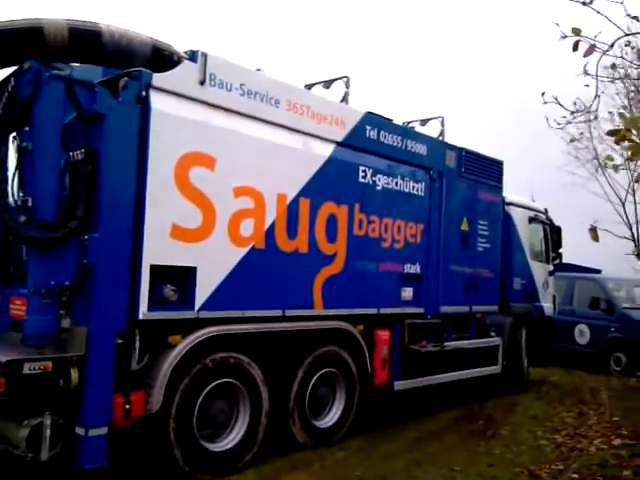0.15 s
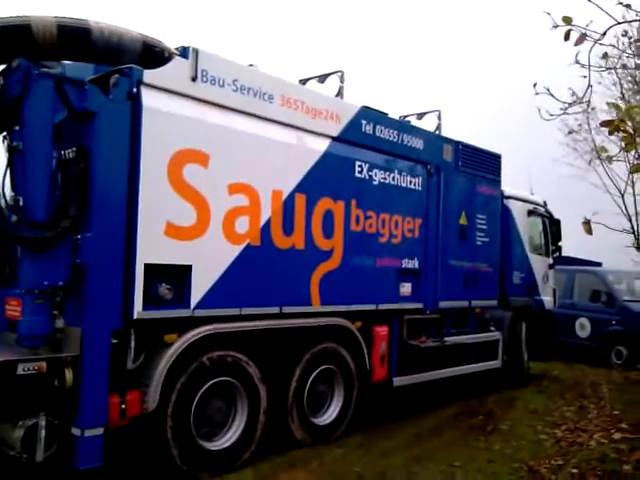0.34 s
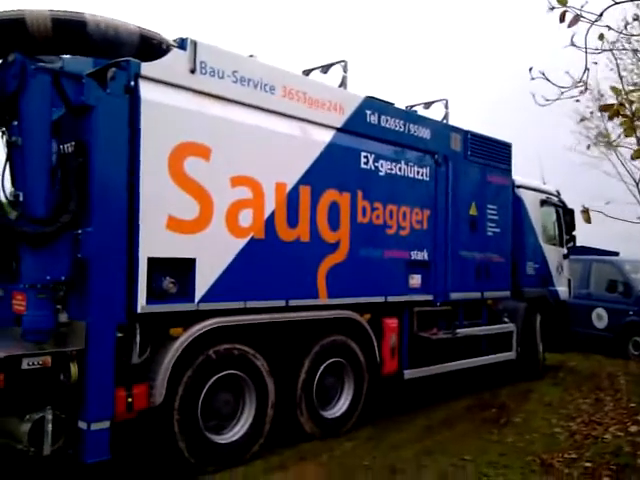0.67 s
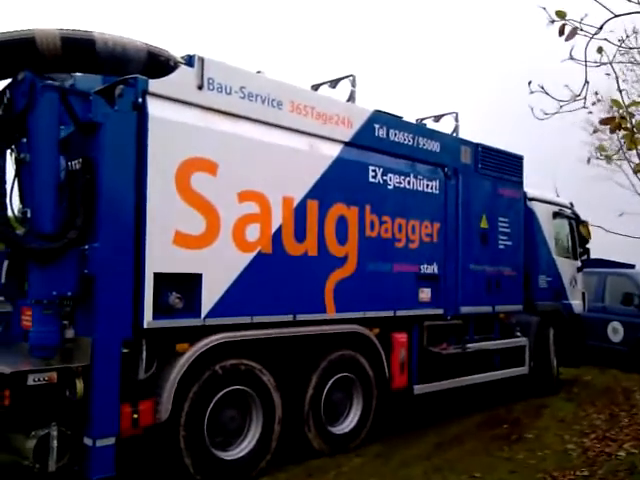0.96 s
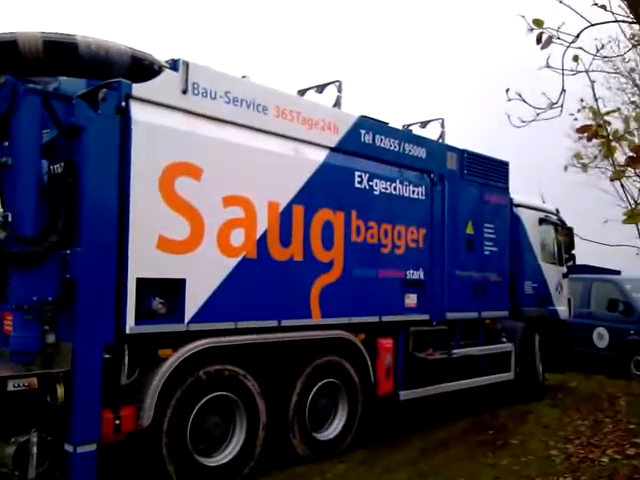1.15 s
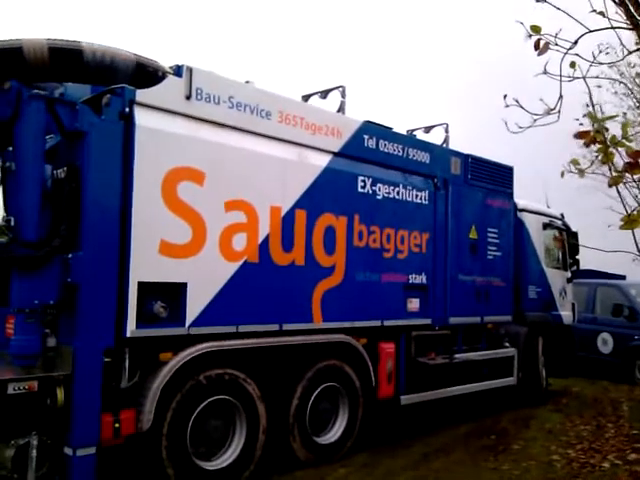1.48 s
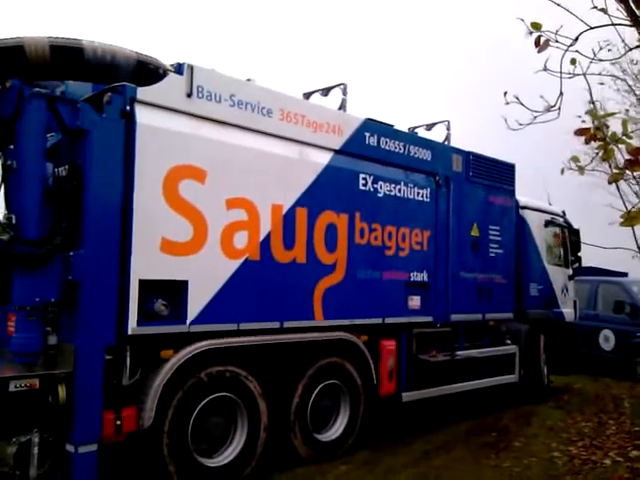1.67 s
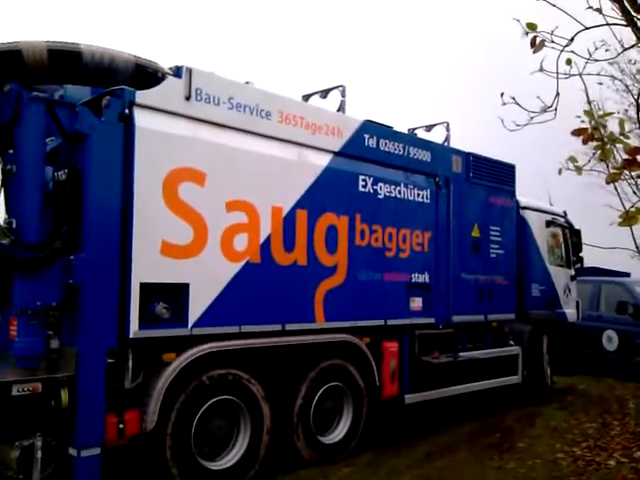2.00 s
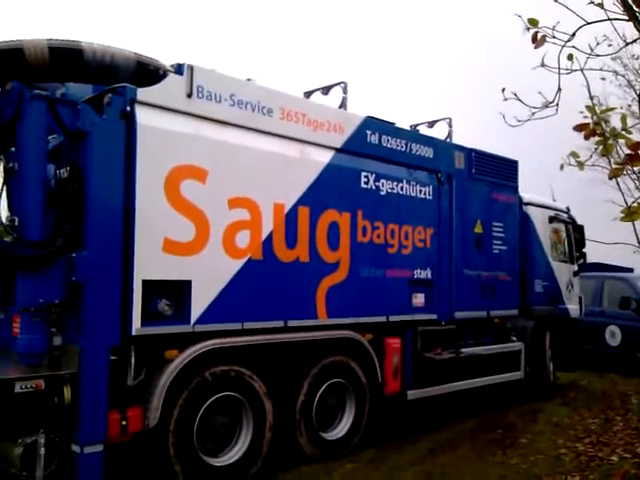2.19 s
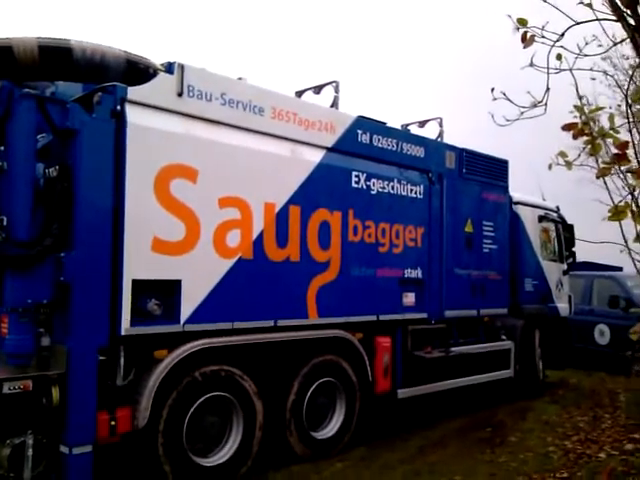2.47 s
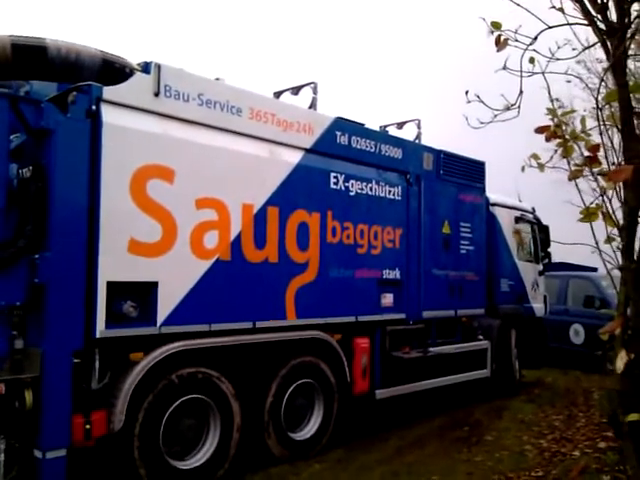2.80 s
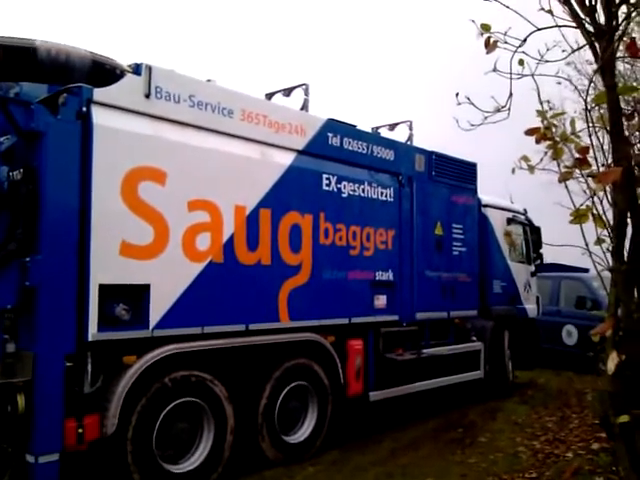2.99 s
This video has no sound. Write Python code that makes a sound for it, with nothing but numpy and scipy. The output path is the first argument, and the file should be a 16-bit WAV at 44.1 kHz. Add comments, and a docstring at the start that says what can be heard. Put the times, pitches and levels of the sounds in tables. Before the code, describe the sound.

A vacuum excavator drones and whistles as grit and stones knock through the hose.

```python
"""A suction excavator works in place: from the start its diesel drones, its fan hums and whines, and air
roars through the hose under a wandering whistle. A few stones tick, then sand and grit swell against the
hose wall. From about 1.1 s wet soil surges through, clods boom, pebbles ping and stones knock hard; the
small, narrow-band microphone overloads on the hardest knocks and the treble crackles. Near 2 s the load
falls away, leaving engine, fan and air, and a little grit returns at the very end."""
import sys
import numpy as np
from scipy import signal
from scipy.fft import rfft, irfft
from scipy.io import wavfile

SR = 44100
rng = np.random.default_rng(int(sys.argv[2]) if len(sys.argv) > 2 else 0)


def wav_record(signal):
    """Record a signal, one row per channel, as 16-bit PCM in the file named by sys.argv[1]."""
    frames = np.transpose(np.atleast_2d(signal))
    bounded = np.clip(frames, -1, 1)
    # unit amplitude maps onto the largest positive 16-bit level
    quanta = np.round(bounded * 32767).astype(np.int16)
    wavfile.write(sys.argv[1], SR, quanta)


N = 138474


def undb(db):
    """Decibels to gain."""
    return 10 ** (np.asarray(db) / 20)


def unit(x):
    """Scale to rms 1."""
    return x / np.sqrt(np.mean(np.abs(x) ** 2))


def curve(rows, axis=1):
    """An automation lane: one column of a table, joined by straight lines in time."""
    rows = np.array(rows, float)
    return np.interp(np.arange(N) / SR, rows[:, 0], rows[:, axis])


def colour(x, points):
    """EQ x through (f/Hz, level/dB) points, rolled off below the first, and scale to rms 1."""
    hz, db = np.array(points, float).T
    f = np.maximum(np.arange(N // 2 + 1) * SR / N, 1e-3)
    low_cut = np.minimum(f / hz[0], 1) ** 2
    eq = undb(np.interp(np.log(f), np.log(hz), db))
    return unit(irfft(rfft(x) * low_cut * eq, N))


def drift(rate_hz):
    """A smooth random modulator at rms 1, moving at up to about rate_hz."""
    f = np.arange(N // 2 + 1) * SR / N
    smoothing = np.exp(-.5 * (f / rate_hz) ** 2) * (f > 0)
    return unit(irfft(rfft(rng.standard_normal(N)) * smoothing, N))


def tone(hz, width_hz, rough):
    """A tone at rms 1, blurred by turbulence."""
    blur = 1 + rough * (drift(width_hz) + 1j * drift(width_hz))
    cycles = np.cumsum(hz * np.ones(N)) / SR
    return unit(np.real(blur * np.exp(2j * np.pi * cycles)))


def grains(per_s, spread_db):
    """Random impacts of uneven size."""
    hit = rng.random(N) < per_s / SR
    polarity = np.sign(rng.standard_normal(N))
    return hit * polarity * undb(spread_db * np.minimum(rng.exponential(size=N), 4))


# partials of the engine drone: multiple of the crank speed, level/dB
ENGINE_ORDERS = [(4, -48), (5, -43.5), (6, -42), (10, -44), (15, -51.5)]

def diesel(crank_hz=17.65):
    """The low bed: the engine holds its speed and drones on orders of the crank."""
    hz = crank_hz * (1 + 0.0022 * drift(4.1))
    return sum(undb(db) * tone(order * hz, width_hz=7.8, rough=0.4) for order, db in ENGINE_ORDERS)


# hum of the fan blades: f/Hz, level/dB, width/Hz
BLADE_TONES = [(480.2, -35, 1.3), (810, -42.5, 8.8), (954, -41, 3.1), (1420, -52, 5), (2364, -44, 11),
               (2480, -51, 4)]
# fader ride of the whine: t/s, level/dB
WHINE_RIDE = [(0, -40), (.3, -28.5), (.9, -31), (1.7, -28), (2.3, -32), (3.14, -38)]

def fan(whine_hz=1880):
    """The blades hum in a cluster of tones while a whine swells and fades on one pitch."""
    speed = 1 + .0012 * drift(1.7)
    blades = sum(undb(db) * tone(hz * speed, width, rough=0.28) for hz, db, width in BLADE_TONES)
    whine = undb(curve(WHINE_RIDE)) * tone(whine_hz, width_hz=6.2, rough=0.073)
    return blades + whine


# path of the air whistle: t/s, f/Hz, level/dB
WHISTLE_PATH = [(0, 2165, -38), (.25, 2135, -32.5), (.45, 2055, -32), (.68, 2015, -25.5), (.9, 2003, -37),
                (1.45, 2005, -29), (1.9, 1948, -25.5), (2.02, 1934, -31), (2.3, 1943, -31.5),
                (2.4, 2003, -25), (2.5, 2118, -38.5), (2.73, 2086, -31), (2.83, 2163, -35.5),
                (3.05, 2080, -34), (3.14, 2090, -35)]

def whistle():
    """A breathy whistle wanders with the airflow."""
    hz = curve(WHISTLE_PATH) * (1 + .004 * drift(6.85))
    return undb(curve(WHISTLE_PATH, axis=2)) * tone(hz, width_hz=45, rough=0.93)


# colour of the rushing air: f/Hz, relative level/dB
ROAR_EQ = [(20, -13.5), (45, -2), (70, -7), (110, -1), (155, 1), (220, 0.5), (300, -0.5), (400, -6.5),
           (520, -1), (750, -2), (900, -2), (1040, -5), (1250, 0.5), (1650, -3.5), (2050, 1), (2300, -3.5),
           (2750, -8.5), (3200, -5), (3550, -10), (3800, -12.5)]
# fader ride of the roar: t/s, level/dB
ROAR_RIDE = [(0, -19), (.6, -21), (1.9, -21), (2.3, -21.5), (2.6, -22), (3.14, -22)]

def air():
    """Turbulent air roars through the hose with a slight flutter."""
    roar = colour(rng.standard_normal(N), ROAR_EQ)
    flutter_db = .5 * drift(16)
    return roar * undb(curve(ROAR_RIDE) + flutter_db)


# colour of the sand hiss: f/Hz, relative level/dB
SAND_EQ = [(2000, -25), (2800, -20.5), (3100, -3), (3330, -3), (3550, -4.5), (3800, -14.5)]
# flow of sand: t/s, level/dB
SAND_RIDE = [(0, -25.5), (.15, -35), (.4, -24), (.66, -19), (.78, -17), (.87, -17.5), (.97, -16),
             (1.08, -18.5), (1.16, -17), (1.3, -21), (1.6, -22), (1.67, -15), (1.75, -21), (1.86, -21),
             (1.95, -35), (2.8, -37), (3.1, -24)]

def sand():
    """Fine sand sprays the hose wall in clumps: the bright hiss on top of the load."""
    spray = grains(per_s=6000, spread_db=1.5) * undb(2.0 * drift(39))
    return colour(spray, SAND_EQ) * undb(curve(SAND_RIDE))


# colour of the hose wall when struck: f/Hz, relative level/dB
WALL_EQ = [(300, -19.5), (600, -7.5), (1000, -7), (1280, -0.5), (1550, -4), (1850, -1), (2200, -4.5),
           (2550, -11), (2900, -8), (3800, -26.5)]
# flow of grit: t/s, level/dB
GRIT_RIDE = [(0, -26), (.07, -22), (.14, -31), (.3, -33), (.6, -22), (.85, -18), (.97, -15), (1.1, -17),
             (1.5, -18.5), (1.68, -15.5), (1.77, -19), (1.88, -16), (1.94, -32), (2.02, -21), (2.1, -31.5),
             (2.7, -48.5), (3.14, -25)]

def grit():
    """Grit pelts the hose wall unevenly: a dense midrange rattle."""
    spray = grains(per_s=7000, spread_db=2.0) * undb(1.2 * drift(60))
    return colour(spray, WALL_EQ) * undb(curve(GRIT_RIDE))


# colour of the hose under heavy wet soil: f/Hz, relative level/dB
SOIL_EQ = [(80, -23), (150, -4), (235, -3.5), (370, -3.5), (500, 1), (700, 2.5), (1000, -4), (1280, 4),
           (1600, -8), (2300, -25.5), (3500, -31.5)]
# surges of soil: t/s, level/dB
SOIL_RIDE = [(0, -54), (1.11, -36.5), (1.15, -15), (1.22, -23), (1.29, -14.5), (1.385, -22), (1.425, -16),
             (1.515, -21.5), (1.575, -13), (1.68, -22.5), (1.715, -14.5), (1.745, -27.5), (1.78, -15),
             (1.81, -28), (1.86, -16), (1.94, -28), (2.15, -41), (3.14, -53)]

def soil():
    """Wet soil slaps the hose wall in surges: the dark body of the load."""
    splatter = grains(per_s=3000, spread_db=2.5) * undb(0.98 * drift(45))
    return colour(splatter, SOIL_EQ) * undb(curve(SOIL_RIDE))


# booms of the hose: peak t/s, level/dB, f/Hz, half length/s
CLOD_BOOMS = [(1.25, -28, 216.8, 0.057), (1.29, -18, 503, 0.013), (1.566, -23, 265.3, 0.012),
              (1.652, -22.5, 226, .012), (1.711, -22.5, 303.5, 0.013), (1.79, -25, 214, 0.021),
              (1.895, -22.5, 235, .025)]

def clods():
    """Heavy lumps thud in the hose, each a short swell of rough, low tone."""
    t, out = np.arange(N) / SR, np.zeros(N)
    for peak, db, hz, half_length in CLOD_BOOMS:
        swell = np.exp(-.5 * ((t - peak) / half_length) ** 2)
        out += undb(db) * swell * tone(hz, width_hz=45, rough=.9)
    return out


# sharp pebbles on the metal pipe: t/s, level/dB
PEBBLE_HITS = [(.767, -9), (.996, -13), (1.159, -9.5), (1.219, -12), (1.642, -11), (1.652, -11),
               (1.682, -10), (1.694, -7.5)]

def pebbles(ring_hz=3264, scatter=0.026, attack_s=0.0013, decay_s=0.0022):
    """Each pebble pings the metal pipe at a slightly different pitch."""
    out, t = np.zeros(N + SR), np.arange(SR // 16) / SR
    envelope = (1 - np.exp(-(t / attack_s) ** 2)) * np.exp(-t / decay_s)
    for (start, db), (detune, phase) in zip(PEBBLE_HITS, rng.standard_normal((len(PEBBLE_HITS), 2))):
        i = int(start * SR)
        hz = ring_hz * (1 + scatter * detune)
        ring = np.sin(2 * np.pi * (hz * t + phase))
        out[i:i + len(t)] += undb(db) * envelope / envelope.max() * ring
    return out[:N]


# stones hitting the hose: t/s, level/dB, ring f/Hz, decay/s
STONE_HITS = [(0.0513, -7, 1360, .0022), (0.0547, -5, 1810, 0.0049), (0.0772, -12.5, 1100, 0.00098),
              (.767, -8, 1340, 0.0036), (.9095, -8.5, 1780, 0.0016), (.9265, -18, 1900, .003),
              (.949, -10, 1300, .0025), (.984, -13, 1820, .007), (0.997, -14, 1730, .0025),
              (1.15, -9.5, 1890, .0028), (1.183, -7, 1240, .0025), (1.191, -7, 1260, 0.0018),
              (1.291, -15, 1280, 0.0038), (1.311, -5, 1396, 0.0045), (1.402, 0, 1420, 0.0022),
              (1.414, 0.5, 1390, 0.0033), (1.46, -4, 1370, 0.0024), (1.599, -5.5, 1315, 0.0033),
              (1.624, -4, 1217, .0042), (1.647, -9.5, 1924, .006), (1.71, -4, 1340, 0.0026),
              (1.7355, -5.5, 1980, .0024), (1.7733, -8.5, 1260, .0024), (1.793, -3.5, 1360, 0.0018),
              (1.845, -9.5, 1335, .004), (1.882, -10, 1280, 0.002)]

def stones(attack_s=0.0013, chirp_s=0.0012, chirp_depth=0.696, click_hz=3274, rattle_s=0.013):
    """The lead hits: each knock chirps up into a short ring, with a hard click and a rattle of the wall."""
    out, t = np.zeros(N + SR), np.arange(SR // 8) / SR
    wall = colour(rng.standard_normal(N), WALL_EQ)
    attack = 1 - np.exp(-(t / attack_s) ** 2)
    for (start, db, hz, decay), phase in zip(STONE_HITS, rng.random((len(STONE_HITS), 2))):
        i = int(start * SR)
        envelope = attack * np.exp(-t / decay)
        cycles = np.cumsum(hz * (1 - chirp_depth * np.exp(-t / chirp_s))) / SR
        ring = np.sin(2 * np.pi * (cycles + phase[0]))
        click = undb(-10.5) * np.sin(2 * np.pi * (click_hz * t + phase[1]))
        rattle = undb(-11) * attack * np.exp(-t / rattle_s) * wall[i:i + len(t)]
        out[i:i + len(t)] += undb(db) * (envelope / envelope.max() * (ring + click) + rattle)
    return out[:N]


def scene():
    """The mono mix from a few metres beside the truck: the machine bed under the load."""
    bed = diesel() + fan() + whistle() + air()
    load = sand() + grit() + soil() + stones() + pebbles() + clods()
    return (bed + load)[None]


# treble crackles, cued around the loud knocks: t/s, relative level/dB
CRACKLE_CUES = [(0.9106, -41), (0.9266, -35), (0.96, -32), (0.997, -34), (1.1518, -27.5), (1.1845, -30),
                (1.3119, -27), (1.4023, -20), (1.4162, -22), (1.4523, -31.5), (1.5982, -25.5), (1.624, -23),
                (1.6492, -24), (1.695, -26.5), (1.7113, -25), (1.736, -18.5), (1.7935, -20.5),
                (1.846, -30.5), (1.8823, -35)]
# colour of the crackle: f/Hz, relative level/dB
CRACKLE_EQ = [(4000, 2.5), (6000, -1.5), (11000, -11.5), (14000, -22)]

def crackle(crack_s=0.00059, rasp_s=0.0064):
    """At each cue a faint crack above the main band trails off in a grainy rasp."""
    t, envelope = np.arange(N) / SR, np.zeros(N)
    for start, db in CRACKLE_CUES:
        age = np.maximum(t - start, 0)
        attack = np.exp(-np.maximum(start - t, 0) / crack_s)
        tail = np.exp(-age / crack_s) + undb(-12.5) * np.exp(-age / rasp_s)
        envelope += undb(db) * attack * tail
    fizz = rng.standard_normal(N) * undb(3.1 * drift(300))
    return undb(-3.5) * envelope * colour(fizz, CRACKLE_EQ)


def mic_band(x, edge_hz=3860):
    """The microphone's steep high cut."""
    f = np.arange(N // 2 + 1) * SR / N
    return irfft(rfft(x) / np.sqrt(1 + (f / edge_hz) ** 48), N)


def record(dry):
    """A narrow-band microphone soft-clips the loudest peaks; the crackle is layered on top."""
    knee, ceiling, top_hz = 0.55, 0.63, 15800
    heard = mic_band(dry)
    below_knee = np.clip(heard, -knee, knee)
    headroom = ceiling - knee
    clipped = below_knee + headroom * np.tanh((heard - below_knee) / headroom)
    top_cut = signal.ellip(8, .2, 70, top_hz, fs=SR, output="sos")
    return signal.sosfilt(top_cut, mic_band(clipped) + crackle())


dry = scene()
out = record(dry)
wav_record(out)
```